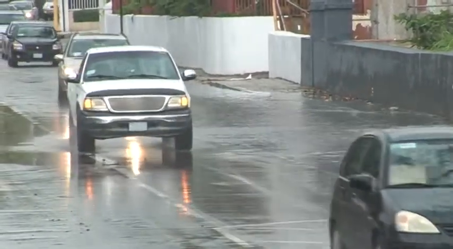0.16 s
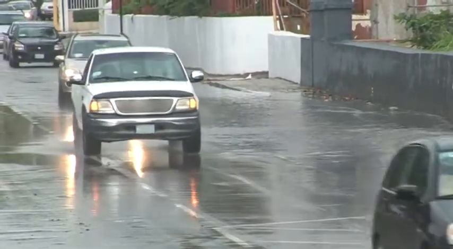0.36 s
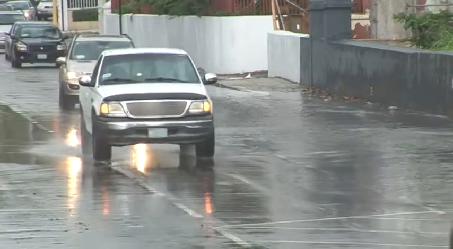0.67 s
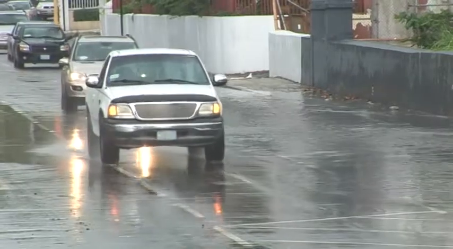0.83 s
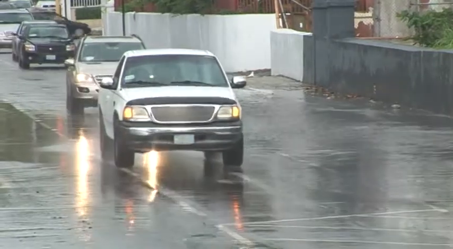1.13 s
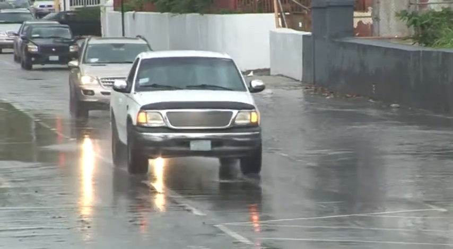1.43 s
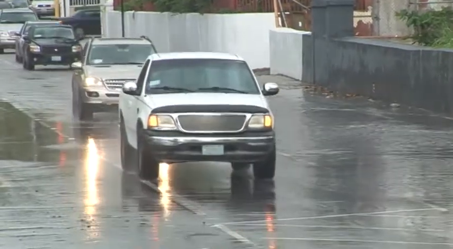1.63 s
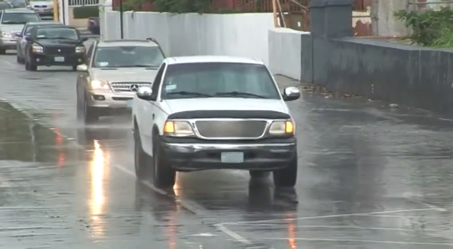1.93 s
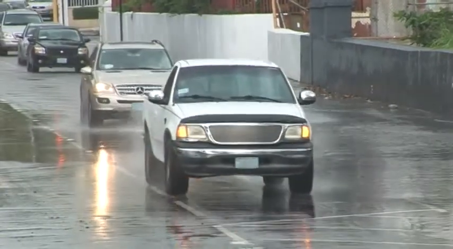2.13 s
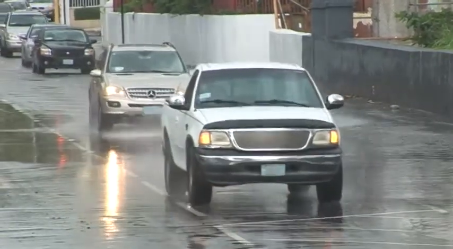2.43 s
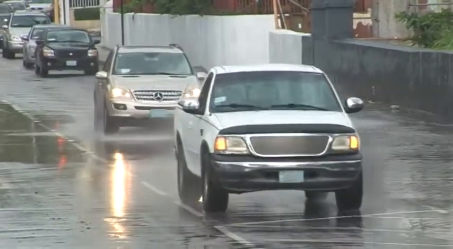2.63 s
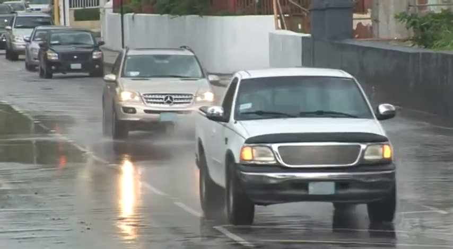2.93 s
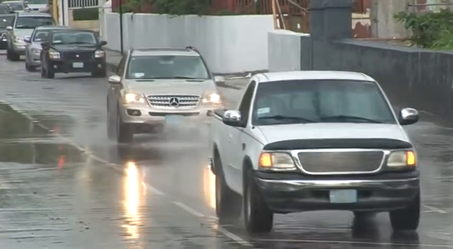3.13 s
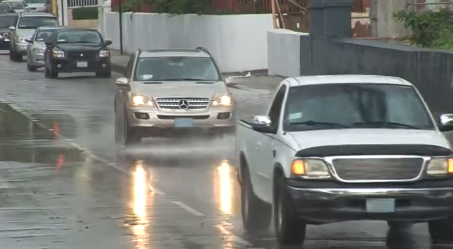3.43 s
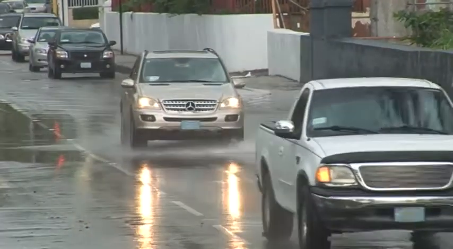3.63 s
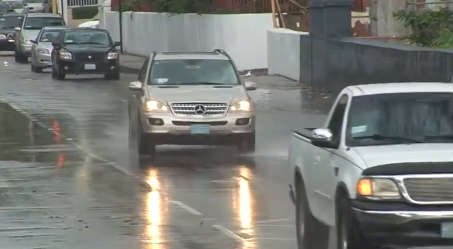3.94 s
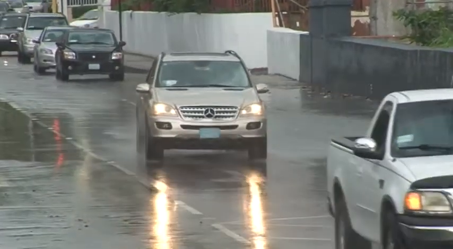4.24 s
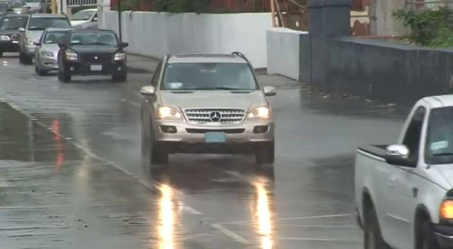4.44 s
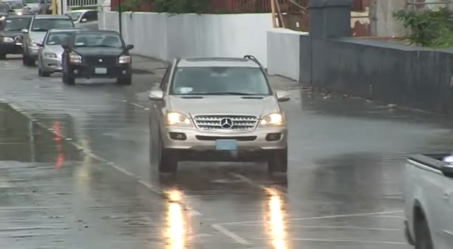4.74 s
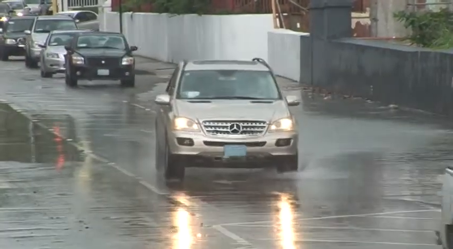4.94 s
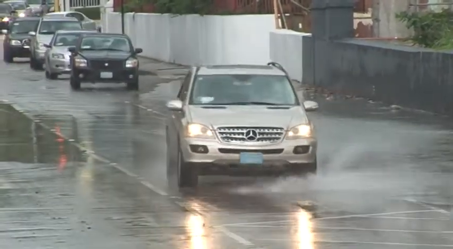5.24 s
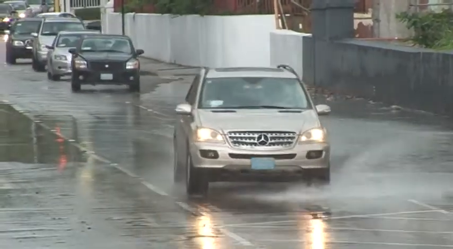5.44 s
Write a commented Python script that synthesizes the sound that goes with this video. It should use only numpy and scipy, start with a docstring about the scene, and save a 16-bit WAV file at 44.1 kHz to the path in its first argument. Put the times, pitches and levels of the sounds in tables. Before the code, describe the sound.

Heard from the side of a waterlogged street, tyres keep up a wet hiss, with quick splashes and spray over a low hum of engines and far traffic. About halfway through, a pickup truck goes by close on the right with a rising road roar and a deep engine drone. Thin, barely audible brake squeaks follow, and the truck fades while the watery swish carries on.

```python
"""A wet street with standing water, heard by a forward and a sideways capsule.
Tyres part the water (swish, hiss) and fling drops (spray). A pickup passes close on the right:
tyre roar with a road echo and a tread resonance, body boom, the firing tones of a pulling engine.
Two more engines hum further back over distant traffic and rumble.
A wet brake pad grabs and slips, squeaking faintly."""
import sys
import numpy as np
from scipy import signal
from scipy.fft import rfft, irfft, next_fast_len
from scipy.io import wavfile
from scipy.ndimage import uniform_filter1d, map_coordinates

SR = 44100
rng = np.random.default_rng(int(sys.argv[2]) if len(sys.argv) > 2 else 0)


def output_pcm(signal):
    """Save a mono or channel-first signal as 16-bit PCM at the path in sys.argv[1].

    Samples are clipped to [-1, 1] before scaling.
    """
    pcm = np.clip(np.atleast_2d(signal).T, -1, 1) * 32767
    wavfile.write(sys.argv[1], SR, np.round(pcm).astype(np.int16))


N = 246519

# noise spectra, (forward, sideways): f/Hz, relative level/dB
TRAFFIC_SPECTRA = ([(70, -62), (120, -7), (165, -2.5), (200, -5.5), (295, -10.5), (398, -14), (555, -16.5),
                   (760, -20), (1050, -15.5), (1460, -17.5), (1700, -14.5), (2300, -75)], [(90, -26),
                   (216, -1), (393, -0.5), (548, 3), (1540, 5), (1700, 3), (2300, -46)])
SWISH_SPECTRA = ([(900, -66), (1240, -8.5), (1500, -22.5), (1750, -5.5), (2200, -0.5), (2580, -1.5),
                 (2880, -4.5), (4000, -9), (4530, -17), (5020, -8.5), (5430, -20), (5880, -15),
                 (6400, -24.5), (7300, -35), (7800, -33), (8600, -84)], [(900, -60), (1500, -26),
                 (1760, 2.5), (2460, -4.5), (2740, -3), (3190, -29), (3600, 1.5), (4400, 3.5), (5270, -1),
                 (5900, 9), (6500, -4), (7300, -16), (8300, -48)])
SPRAY_SPECTRA = ([(6000, -52), (7900, -31), (8400, -1), (8740, -1.5), (10300, -1), (11900, 2.5),
                 (13400, -2.5), (14900, -3), (15800, -7.5)], [(6300, -46), (7500, 2), (8910, 0),
                 (10600, -6), (12200, -4), (13800, -3.5), (15800, -10)])
ROAR_SPECTRA = ([(210, -78), (380, -11), (535, -4.5), (650, -7), (780, -4), (1050, -10), (1300, -9.5),
                (1630, -11), (2410, -15.5), (3400, -83)], [(150, -60), (250, -8), (370, -15), (590, 1),
                (990, 1.5), (1210, -6), (1630, -3), (3200, -15.5), (4200, -60)])
BOOM_SPECTRA = [(60, -67), (100, -4), (194, 3.5), (322, 0.5), (450, -10.5), (600, -41.5)], [(90, -41),
                (194, -12), (450, -8), (600, -60)]
# street rumble: f/Hz, relative level/dB
RUMBLE_SPECTRUM = [(10, -45), (30, -6), (55, 3), (108, -1), (170, -11.5), (240, -84)]
# forward sound in the sideways capsule: f/Hz, share/1, phase/rad (pi = from the right)
STREET_COHERENCE = [(200, .4, -2.5), (450, 0.81, -4.5), (900, 0.15, 4.5), (1650, 1, -4)]
WATER_COHERENCE = [(1520, 0.4, 26.5), (2145, 0.7, -13), (3120, 0.1, 11), (3940, 1, -1.5), (5130, 0.84, -2),
                   (6000, 0.3, -1.5), (9000, 0.36, -3.5), (11000, .5, -2), (13000, .75, -3),
                   (15000, .6, -1.5)]
PICKUP_COHERENCE = [(200, 0.88, 1.5), (447.5, 0.82, -1.5), (750, 1, -2), (1100, 0.85, -2.5),
                    (1600, 0.99, -3.5)]
# envelopes of the rumble and two far engines: t/s, level/dB
RUMBLE_LEVEL = [(0, -44), (1.4, -42), (2.15, -36.5), (3.4, -40), (4.2, -37.5), (4.7, -40), (5.59, -41.5)]
DEEP_LEVEL = [(0, -56), (.3, -50), (.65, -38.5), (.95, -41), (1.7, -42.5), (2.05, -51), (2.9, -43),
              (3.4, -40), (4.05, -36.5), (5.1, -40.5), (5.55, -37)]
LIGHT_LEVEL = [(0, -51), (.3, -45), (.9, -46), (1.6, -56), (2.1, -57), (2.8, -38.5), (3.45, -42),
               (4.2, -47), (4.55, -41), (5.59, -44.5)]
# engine harmonics: multiple of the firing rate, relative level/dB
DEEP_HARMONICS = [(1, 0), (3, -17)]
DEEP_OVERTONES = [(2, -1), (3, -8)]
LIGHT_HARMONICS = [(1, 0), (2, -9)]
PICKUP_HARMONICS = [(1, -4), (2, -4), (3, -3.5), (4, -8.5)]
# brake squeaks: t/s, length/s, f/Hz, level before capsule gains/dB
BRAKE_SQUEAKS = [(3.845, .035, 11860, -61), (4.07, .08, 11830, -63), (4.29, 0.24, 11770, -56)]
# stretches where swish and spray swell and the hiss brightens or dulls:
# full from/s, until/s, rise/s, swish/dB, hiss/dB, spray/dB
STRETCH_GAINS = [(0, 1.144, .06, 0, 1.5, 2), (.6, .9, 0.25, 2.5, 1.5, 1),
                 (1.2, 1.552, 0.051, 2.5, -0.5, 0.5), (1.62, 1.91, 0.033, 3, -1.5, 2.5),
                 (2.045, 2.55, 0.076, 2, -2, 0), (3.304, 3.707, 0.71, 1, 5, 6),
                 (4.2, 4.495, 0.12, 0, 2, 0.5), (4.75, 5.1, 0.14, 1, 3, 1)]
# a wheel hits a dip (negative: a shallow patch): t/s, width/s, swish/dB, spray/dB
SPLASH_GAINS = [(0.425, 0.019, 3.5, 2), (0.683, 0.017, 4.5, 3.5), (1.133, 0.02, 5, 0.5),
                (1.243, 0.01, 1.5, -2), (1.604, .012, 2.5, -1), (1.636, 0.017, 5.5, 3),
                (1.686, 0.033, 4.5, 4), (1.954, 0.033, 0.5, 2.5), (2.098, 0.015, 4, 5), (2.413, .045, 1, 3),
                (2.57, 0.015, -0.5, 4), (3.31, 0.025, 1.5, 2.5), (3.442, 0.055, -0.5, 1.5),
                (3.52, 0.015, 0, -1.5), (3.698, .01, 2, 2), (4.825, 0.019, 2.5, 2.5)]
# air pumping in the tread grooves: t/s, f/Hz, boost/dB
TREAD_RESONANCE = [(2.2, 1040, 9), (2.9, 1070, 6), (4, 1090, 6), (4.45, 1150, 11.5), (4.8, 1200, 10),
                   (5.3, 1250, 11)]
# pickup firing rate, pulling then easing off: t/s, f/Hz
PICKUP_FIRING = [(2.2, 58.35), (3.599, 63.96), (4.3, 65.22), (4.8, 61.7)]

LULL_DB, LULL_S = -5, 0.59
DEEP_HZ, DEEP_SAG_FROM_S, DEEP_SAG_HZ_PER_S = 83.8, 2.34, 0.97
OVERTONE_BASE_HZ, OVERTONE_DB, OVERTONE_FADE_DB_PER_S = 84, -42.5, 11
LIGHT_HZ, LIGHT_SAG_HZ_PER_S = 146.6, 1.05
FILM_DB, DRAIN_S = (-2, -4, -1.5), 0.28  # thin film: swish, hiss, spray; the wake settles
SLAP_HZ, SLAP_WIDTH_HZ, SLAP_DB_PER_DB = 2120, 250, 0.73  # heavy water slaps the wheel arch
SIZZLE_HZ, SIZZLE_DB_PER_DB = 10700, 0.56  # heavy spray is brighter
FOOT_HZ, FOOT_DB_PER_DB = 1900, 0.3  # low swish swells less
LANE_M, SPEED_M_PER_S, AXLES_ABREAST_S = 4, 6.12, 3.32
ECHO_FAR, ECHO_NEAR, ECHO_COMING_MS, ECHO_GONE_MS = 0.65, 0.05, 1.87, 2.0
LOWS_COMING_DB, LOWS_GONE_DB, TURN_S = 2.5, -3.5, 0.22


def amp(db):
    """Decibels to gain."""
    return 10 ** (np.asarray(db) / 20)


def unit(x):
    """Scaled to rms 1."""
    return x / np.sqrt(np.mean(x ** 2) + 1e-20)


def at_hz(table, hz, column=1):
    """Table column interpolated over log frequency."""
    cols = np.transpose(table)
    return np.interp(np.log(hz + 1), np.log(cols[0] + 1), cols[column])


def curve(table):
    """A (time, value) table, interpolated per sample."""
    return np.interp(np.arange(N) / SR, *np.transpose(table))


def wobble(rate_hz):
    """Smooth random curve, rate_hz knots a second."""
    knots = rng.standard_normal(int(N * rate_hz / SR) + 4)
    return map_coordinates(knots, [np.arange(N) * rate_hz / SR])


def filtered(x, response):
    """x through a complex frequency response."""
    size = next_fast_len(N + 8192)
    return irfft(rfft(x, size) * response(np.fft.rfftfreq(size, 1 / SR)), size)[..., :N]


def wash(spectra, coherence, patchy_db, grain=1):
    """Patchy, partly coherent noise at both capsules, each of rms 1."""
    bins = signal.stft(grain * rng.standard_normal((2, N)), nperseg=512)[2]
    patches = uniform_filter1d(rng.standard_normal(bins.shape[1:]), size=8, axis=0)
    patches = unit(uniform_filter1d(patches, size=10, axis=1))
    direct, diffuse = signal.istft(bins * amp(patchy_db * patches), nperseg=512)[1][:, :N]
    share = lambda hz: np.clip(at_hz(coherence, hz), 0, 1)
    phase = lambda hz: np.exp(1j * at_hz(coherence, hz, column=2))
    side_gain = lambda hz: amp(at_hz(spectra[1], hz))
    forward = filtered(direct, lambda hz: amp(at_hz(spectra[0], hz)))
    sideways = filtered(direct, lambda hz: side_gain(hz) * share(hz) * phase(hz))
    sideways += filtered(diffuse, lambda hz: side_gain(hz) * np.sqrt(1 - share(hz) ** 2))
    return np.array([unit(forward), unit(sideways)])


def engine(hz, db, harmonics, shake_db, drift_hz, start_s=0, end_s=6):
    """Harmonics of the firing rate, each slightly unsteady."""
    t = np.arange(N) / SR
    cycles = np.cumsum(hz + drift_hz * wobble(6)) / SR
    fade = np.clip(np.minimum(t - start_s, end_s - t) / 0.14, 0, 1)
    tone = sum(amp(level_db + shake_db * wobble(5.09)) * np.sin(2 * np.pi * (k * cycles + rng.random()))
               for k, level_db in harmonics)
    return np.sqrt(2) * amp(db) * fade * tone


def street():
    """Distant traffic builds out of a lull; rumble swells; other cars hum."""
    t = np.arange(N) / SR
    traffic = wash(TRAFFIC_SPECTRA, STREET_COHERENCE, patchy_db=-0.5) * amp([[-41], [-47]])
    mids = filtered(traffic, lambda hz: 1 / (1 + (300 / (hz + 1)) ** 4))
    traffic += mids * (amp(LULL_DB * np.exp(-t / LULL_S)) - 1)
    rumble = unit(filtered(rng.standard_normal(N), lambda hz: amp(at_hz(RUMBLE_SPECTRUM, hz))))
    return traffic + (rumble * amp(curve(RUMBLE_LEVEL)) + far_engines()) * [[1], [0]]


def far_engines():
    """Two engines slow gently; the deep one opens with second and third harmonics that fade out."""
    t = np.arange(N) / SR
    deep_hz = DEEP_HZ - DEEP_SAG_HZ_PER_S * np.maximum(t - DEEP_SAG_FROM_S, 0)
    light_hz = LIGHT_HZ - LIGHT_SAG_HZ_PER_S * t
    deep = engine(deep_hz, curve(DEEP_LEVEL), DEEP_HARMONICS, shake_db=0.5, drift_hz=0.2)
    light = engine(light_hz, curve(LIGHT_LEVEL), LIGHT_HARMONICS, shake_db=0.7, drift_hz=0.25)
    overtones = engine(OVERTONE_BASE_HZ, OVERTONE_DB - OVERTONE_FADE_DB_PER_S * t, DEEP_OVERTONES,
                       shake_db=2, drift_hz=0.5, start_s=-1, end_s=0.7)
    return deep + light + overtones


def brake():
    """A wet pad grabs and slips: a thin, shaky whistle on the right."""
    t, whistle = np.arange(N) / SR, np.zeros(N)
    quiver_cycles = np.cumsum(60 * wobble(200)) / SR
    shake = amp(2.5 * wobble(40))
    for start_s, length_s, hz, db in BRAKE_SQUEAKS:
        swell = np.sin(np.pi * np.clip((t - start_s) / length_s, 0, 1)) ** 0.67
        whistle += amp(db) * swell * np.sin(2 * np.pi * (hz * t + quiver_cycles))
    return whistle * shake * amp([[3], [-3]]) * [[1], [-1]]


def water_gains_db():
    """Swish, hiss and spray gains: the thin film, longer stretches, short splashes."""
    t = np.arange(N) / SR
    gains_db = np.array(FILM_DB)[:, None] + 0.68 * wobble(26.03)
    for from_s, until_s, rise_s, *stretch_db in STRETCH_GAINS:
        ramp = np.minimum(1 + (t - from_s) / rise_s, 1 + (until_s - t) / DRAIN_S)
        gains_db += np.outer(stretch_db, np.clip(ramp, 0, 1))
    for at_s, width_s, swish_db, spray_db in SPLASH_GAINS:
        slope_s = width_s * np.where(t < at_s, 0.6, 1.4)  # fast rise, slower fall
        burst = np.exp(-((t - at_s) / slope_s) ** 2)
        hiss_db = 0.52 * swish_db + 0.56 * spray_db
        gains_db += np.outer([swish_db, hiss_db, spray_db], burst)
    return gains_db


def droplets(rate_hz, spread_db, life_s):
    """Envelope of random drop impacts, a few of them larger."""
    chance, size = rng.random(N), rng.exponential(size=N)
    hits = (chance < rate_hz / SR) * amp(spread_db * np.minimum(size, 4))
    return signal.lfilter([1], [1, -np.exp(-1 / (life_s * SR))], hits)


def tyre_swish(drops, swish_db, hiss_db):
    """Tyres part the water: a swish with hiss on top."""
    grain = 1 + 0.18 * drops * amp(swish_db)  # louder swish, bigger drops
    rush = wash(SWISH_SPECTRA, WATER_COHERENCE, patchy_db=0.67, grain=grain) * amp([[-36], [-42]])
    swish = filtered(rush, lambda hz: 1 / (1 + (hz / 4300) ** 8))
    slap = filtered(swish, lambda hz: np.exp(-((hz - SLAP_HZ) / SLAP_WIDTH_HZ) ** 2))
    swish += slap * (amp(SLAP_DB_PER_DB * swish_db) - 1)
    hiss = rush - swish
    edge = filtered(swish, lambda hz: hz > 3200) * [[0], [1]]  # thin edge of the water, sideways only
    foot = filtered(swish, lambda hz: 1 / (1 + (hz / FOOT_HZ) ** 20))
    core = swish - edge - foot
    return foot * amp(FOOT_DB_PER_DB * swish_db) + core * amp(swish_db) + (hiss + edge) * amp(hiss_db)


def tyre_spray(drops, spray_db):
    """Drops leave the tread in sheets and burst."""
    spray = wash(SPRAY_SPECTRA, WATER_COHERENCE, patchy_db=0.3, grain=1 + 0.3 * drops)
    sizzle = filtered(spray, lambda hz: 1 / (1 + (SIZZLE_HZ / (hz + 1)) ** 8))
    spray += sizzle * (amp(SIZZLE_DB_PER_DB * spray_db) - 1)
    sheets_db = 0.64 * wobble(14)
    return spray * amp(spray_db + sheets_db - 51)


def water():
    """Swish and spray, driven by the same splashes and drops."""
    swish_db, hiss_db, spray_db = water_gains_db()
    drops = droplets(rate_hz=100, spread_db=2.0, life_s=0.0019)
    return tyre_swish(drops, swish_db, hiss_db) + tyre_spray(drops, spray_db)


def pass_gain(abreast_s, peak_db, grows, fades):
    """Gain of a passing pickup part; grows and fades are powers of 1 / distance."""
    along_m = SPEED_M_PER_S * (np.arange(N) / SR - abreast_s)
    spreading_db = 10 * np.log10(1 + (along_m / LANE_M) ** 2)
    return amp(peak_db - np.where(along_m < 0, grows, fades) * spreading_db)


def road_echo(roar):
    """Adds the echo off the wet road, weak at close range; the lows fade after the pass."""
    samples = np.arange(N)
    strength = ECHO_FAR + (ECHO_NEAR - ECHO_FAR) * pass_gain(AXLES_ABREAST_S, 0, grows=1.5, fades=4)
    gone = 0.5 + 0.5 * np.tanh((samples / SR - AXLES_ABREAST_S) / TURN_S)
    delay_ms = ECHO_COMING_MS + (ECHO_GONE_MS - ECHO_COMING_MS) * gone
    earlier = samples - delay_ms * SR / 1000
    echo = np.array([map_coordinates(capsule, [earlier], order=1, mode="mirror") for capsule in roar])
    hollow = (roar + strength * echo) / np.sqrt(1 + strength ** 2)
    lows = filtered(hollow, lambda hz: 1 / (1 + (hz / 800) ** 6))
    return hollow + lows * (amp(LOWS_COMING_DB + (LOWS_GONE_DB - LOWS_COMING_DB) * gone) - 1)


def tread_pumping(roar, width_hz=131):
    """Air pumped in the tread grooves: a gliding resonance on the roar."""
    hz, t, bins = signal.stft(roar, SR, nperseg=1024)
    at_s, centre_hz, boost_db = np.transpose(TREAD_RESONANCE)
    bell = np.exp(-((hz[:, None] - np.interp(t, at_s, centre_hz)) / width_hz) ** 2)
    return signal.istft(bins * amp(np.interp(t, at_s, boost_db) * bell), SR, nperseg=1024)[1][:, :N]


def pickup_engine():
    """Firing tones; the tailpipe sings at the fifth harmonic once the tail is in view."""
    hz = curve(PICKUP_FIRING)
    start_s, end_s = PICKUP_FIRING[0][0], PICKUP_FIRING[-1][0]
    motor = engine(hz, 0, PICKUP_HARMONICS, shake_db=-1, drift_hz=0.35, start_s=start_s, end_s=end_s)
    motor *= pass_gain(abreast_s=3.45, peak_db=-38, grows=1.7, fades=2.8)
    pipe = engine(5 * hz, 0, [(1, 0)], shake_db=1.5, drift_hz=0.8, start_s=3.8, end_s=end_s)
    pipe *= pass_gain(abreast_s=4.15, peak_db=-42.5, grows=0.4, fades=2.7)
    return (motor + pipe) * [[1], [0]]


def pickup():
    """Tyre roar swings to the side as it draws level; engine and body boom peak later."""
    forward_gain = pass_gain(abreast_s=3.1, peak_db=-34.5, grows=1.336, fades=0.64)
    side_gain = pass_gain(AXLES_ABREAST_S, peak_db=-34, grows=3.3, fades=1.87)
    roar = wash(ROAR_SPECTRA, PICKUP_COHERENCE, patchy_db=1)
    roar = tread_pumping(road_echo(roar)) * [forward_gain, side_gain]
    boom = wash(BOOM_SPECTRA, PICKUP_COHERENCE, patchy_db=-1) * amp([[0], [-12]])
    boom *= pass_gain(abreast_s=3.7, peak_db=-37.5, grows=1.34, fades=0.95)
    return roar + boom + pickup_engine()


def scene():
    """Left is forward plus sideways, right is forward minus sideways."""
    forward, sideways = water() + pickup() + street() + brake()
    return np.array([forward + sideways, forward - sideways])


def record(dry, top_hz=15760):
    """Brick-wall band limit."""
    return filtered(dry, lambda hz: hz < top_hz)


dry = scene()
out = record(dry)
output_pcm(out)
```